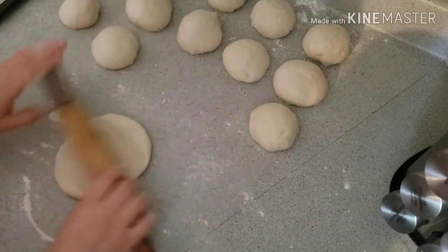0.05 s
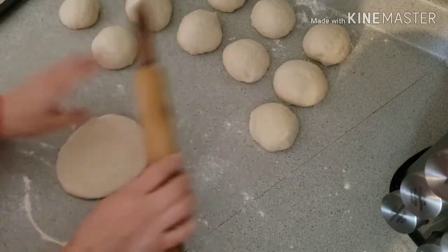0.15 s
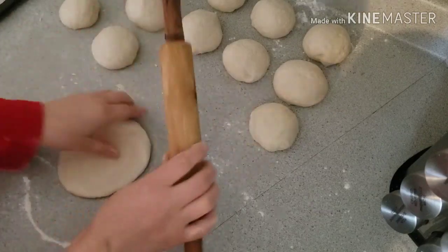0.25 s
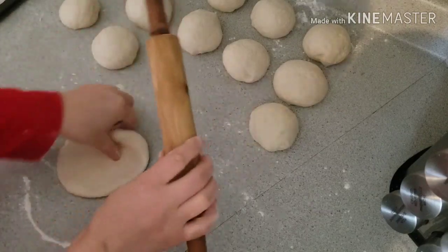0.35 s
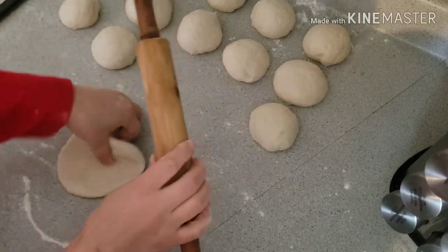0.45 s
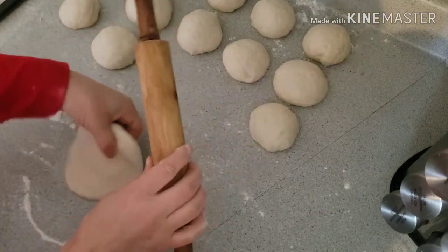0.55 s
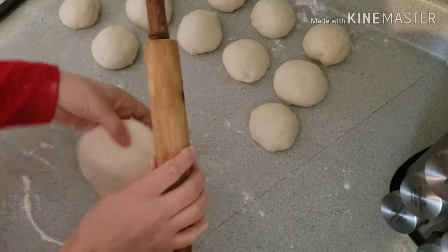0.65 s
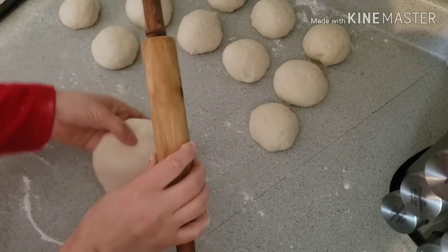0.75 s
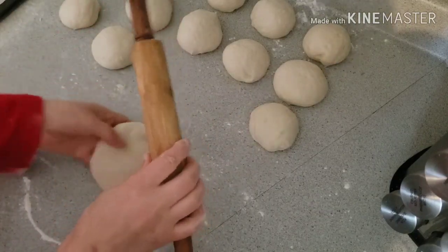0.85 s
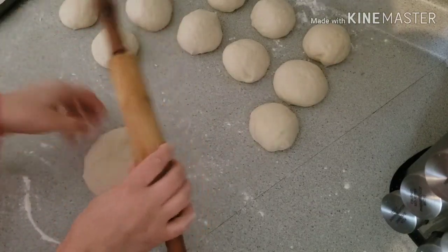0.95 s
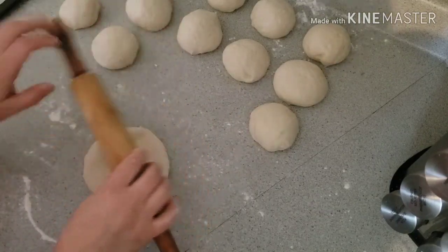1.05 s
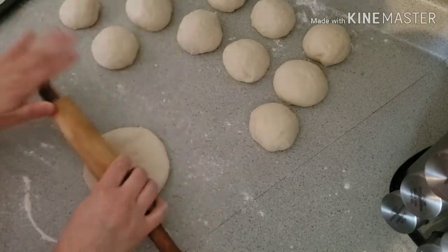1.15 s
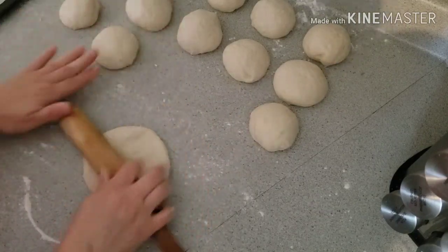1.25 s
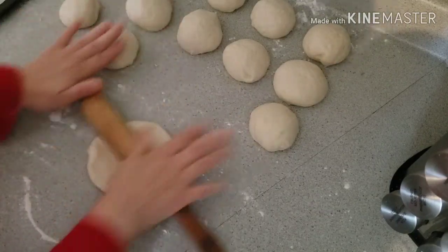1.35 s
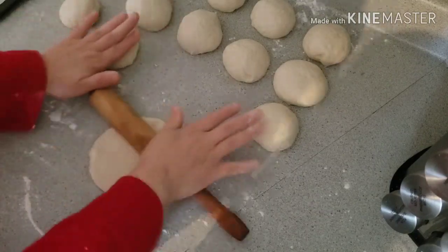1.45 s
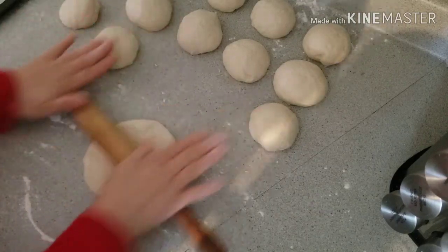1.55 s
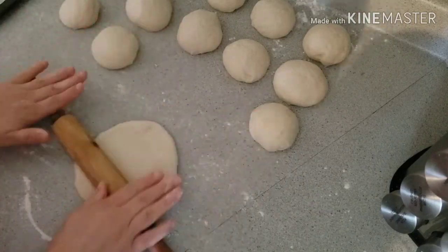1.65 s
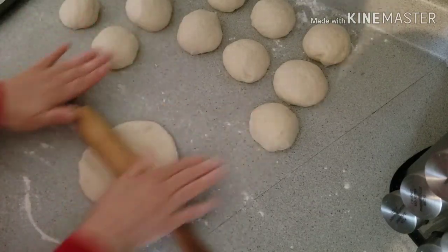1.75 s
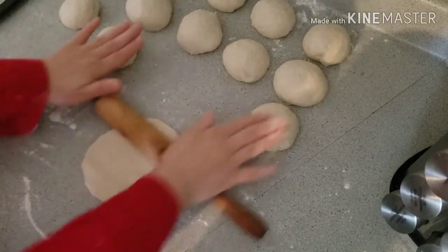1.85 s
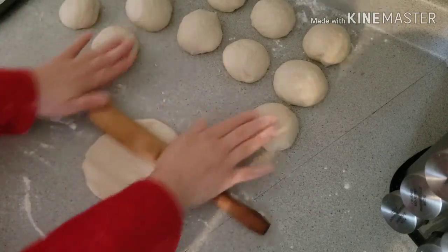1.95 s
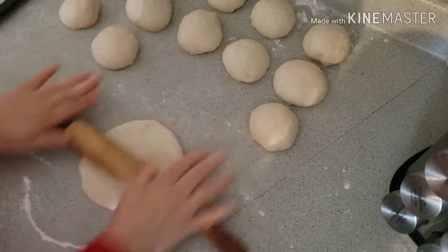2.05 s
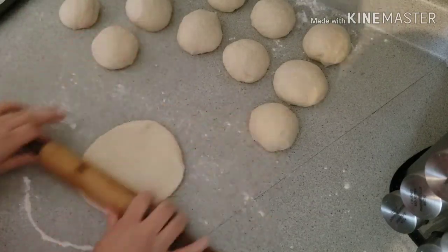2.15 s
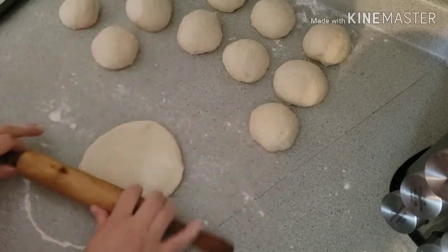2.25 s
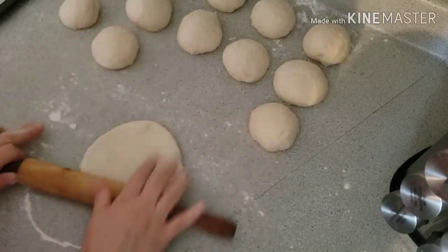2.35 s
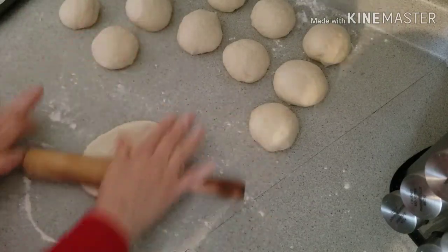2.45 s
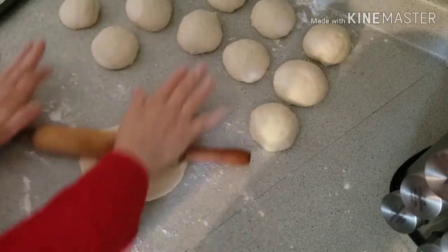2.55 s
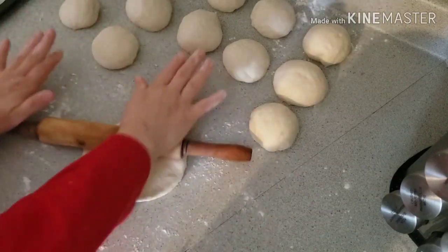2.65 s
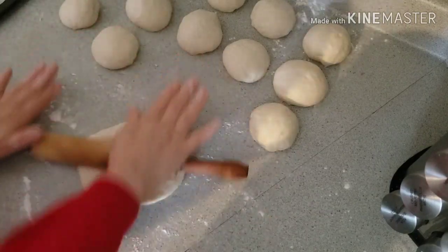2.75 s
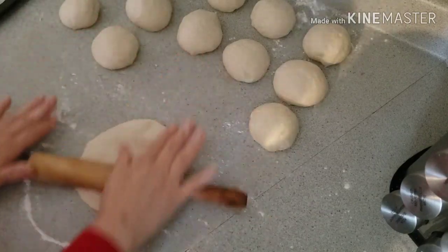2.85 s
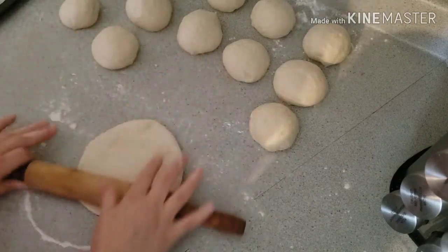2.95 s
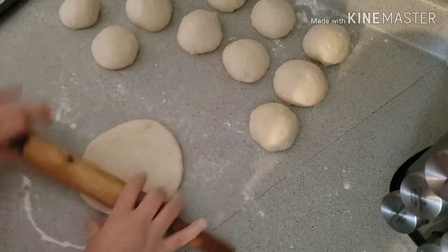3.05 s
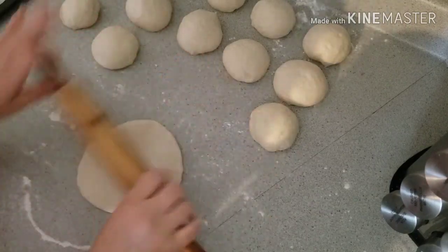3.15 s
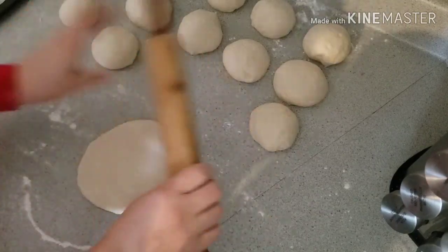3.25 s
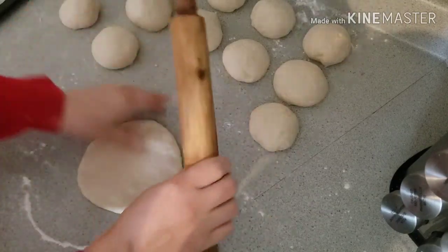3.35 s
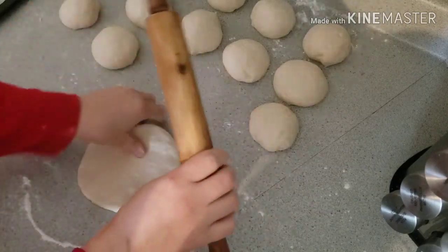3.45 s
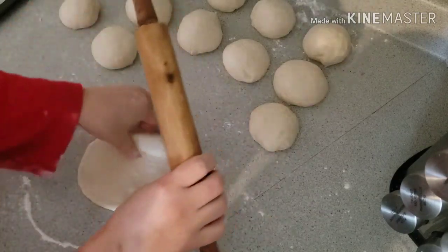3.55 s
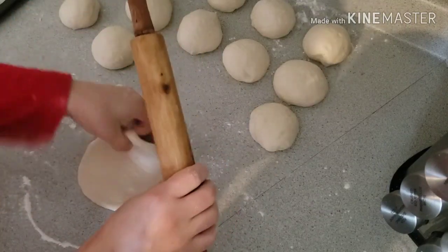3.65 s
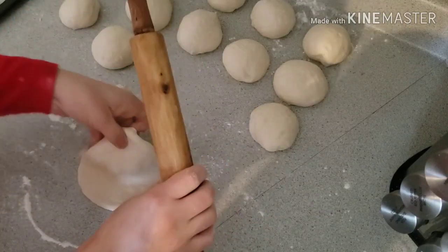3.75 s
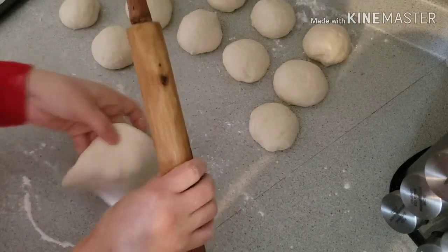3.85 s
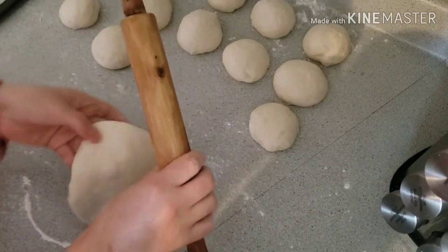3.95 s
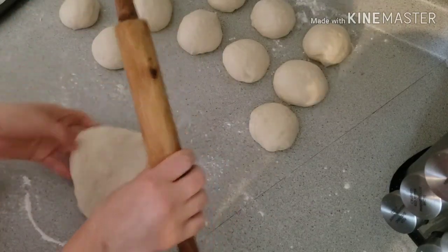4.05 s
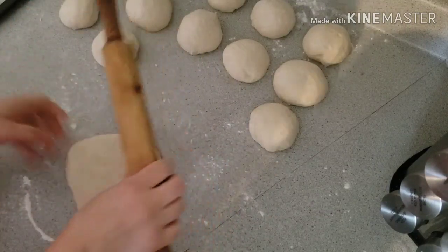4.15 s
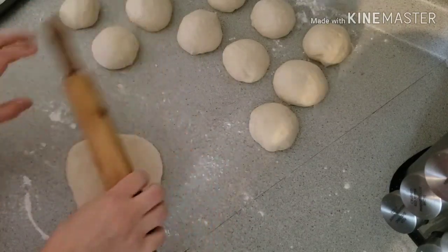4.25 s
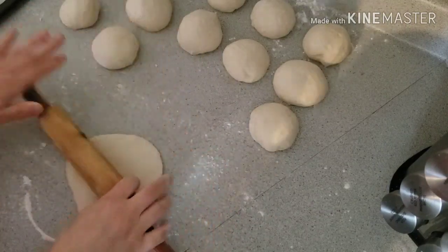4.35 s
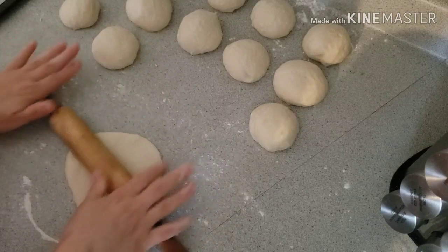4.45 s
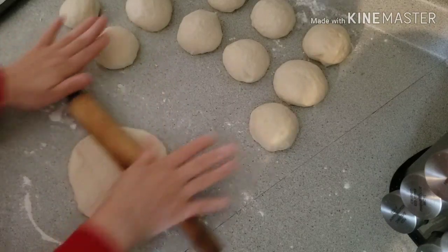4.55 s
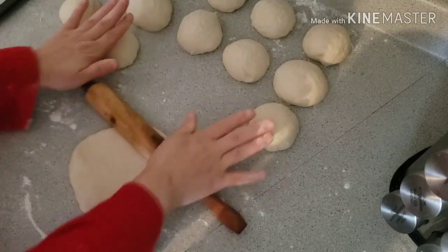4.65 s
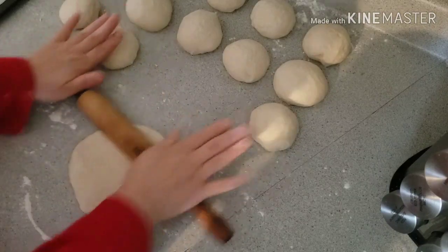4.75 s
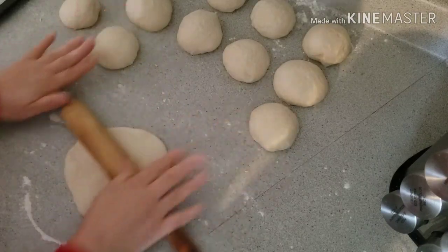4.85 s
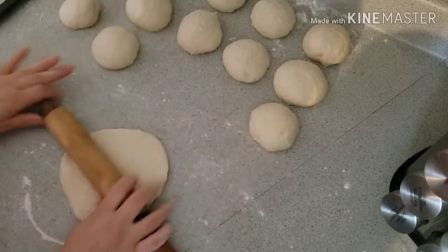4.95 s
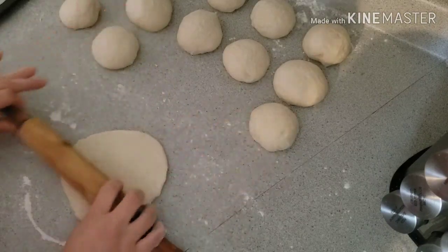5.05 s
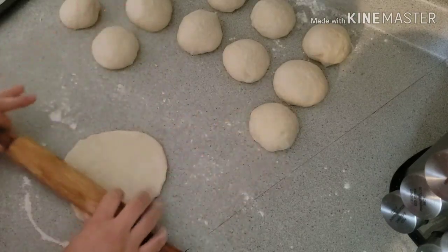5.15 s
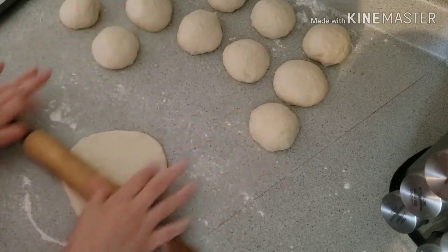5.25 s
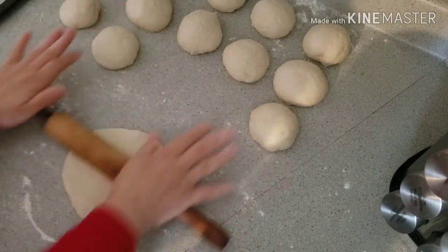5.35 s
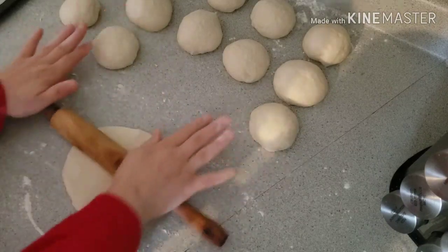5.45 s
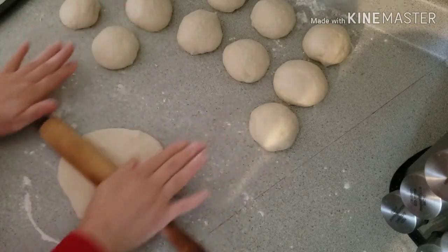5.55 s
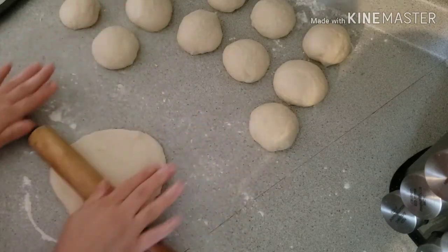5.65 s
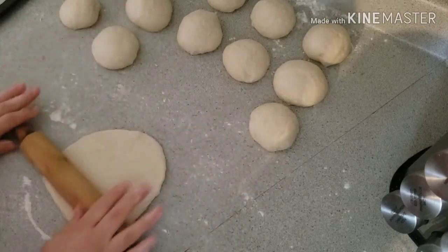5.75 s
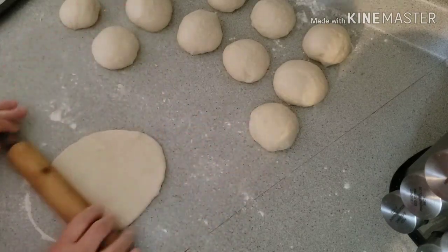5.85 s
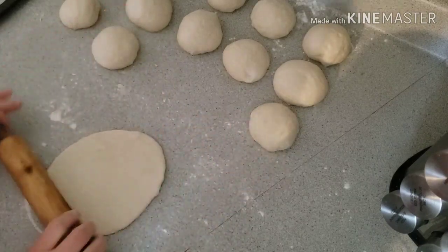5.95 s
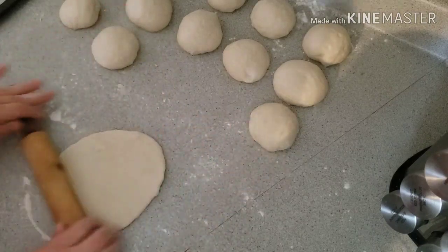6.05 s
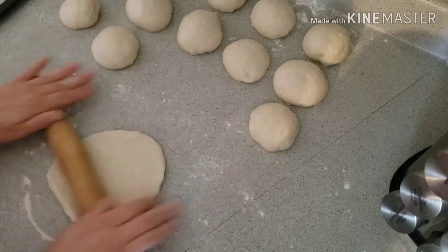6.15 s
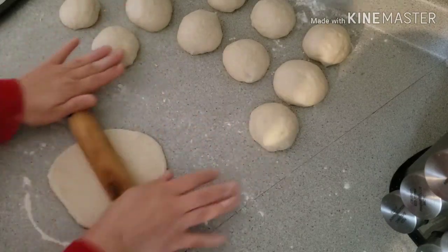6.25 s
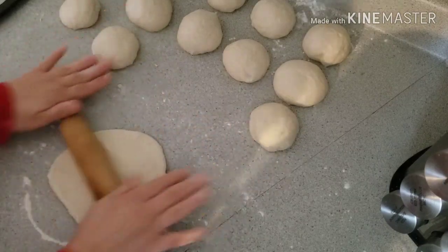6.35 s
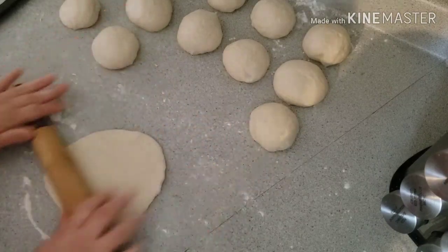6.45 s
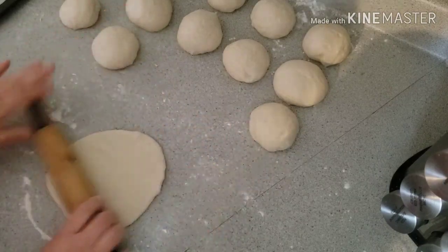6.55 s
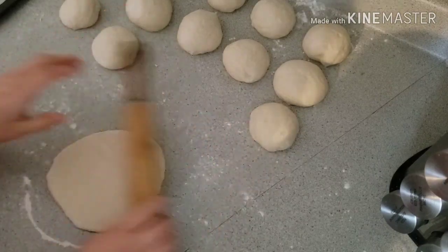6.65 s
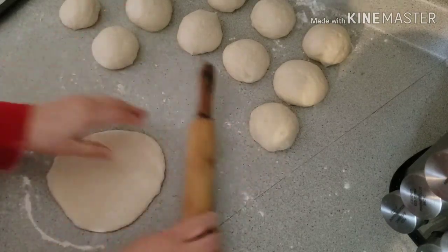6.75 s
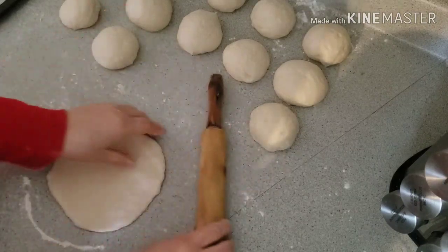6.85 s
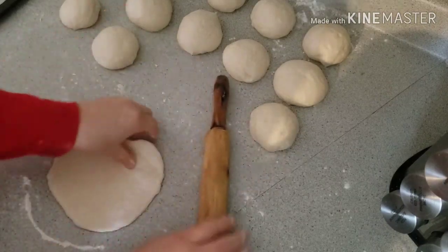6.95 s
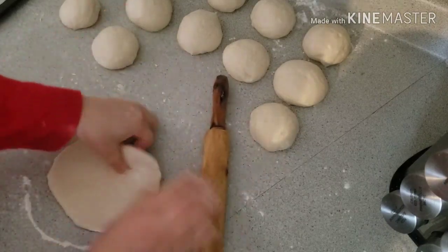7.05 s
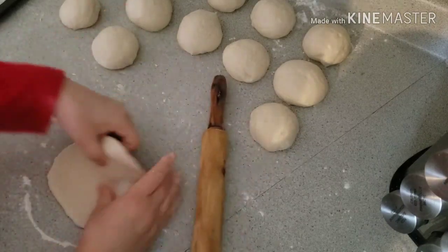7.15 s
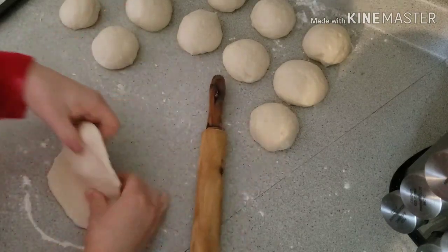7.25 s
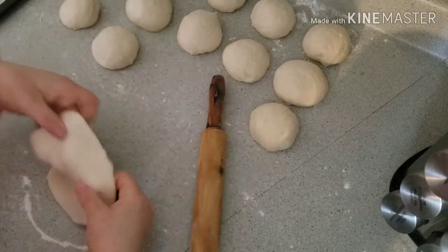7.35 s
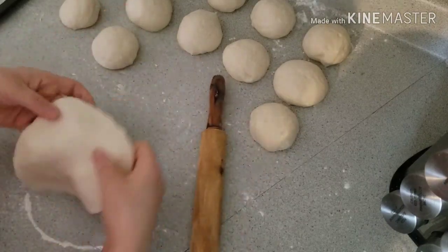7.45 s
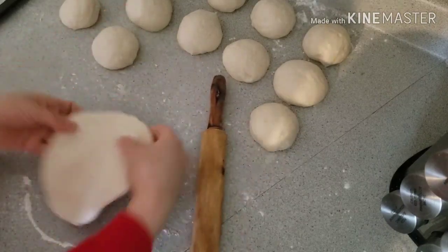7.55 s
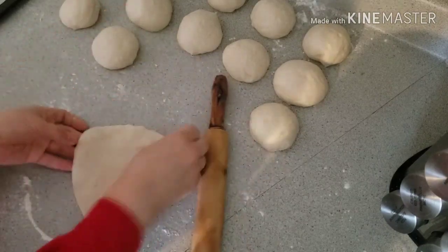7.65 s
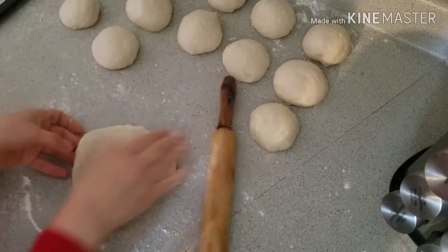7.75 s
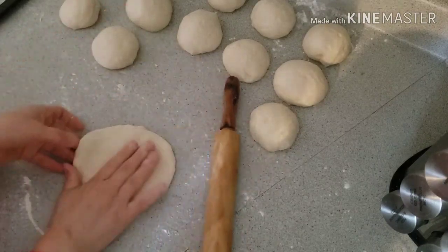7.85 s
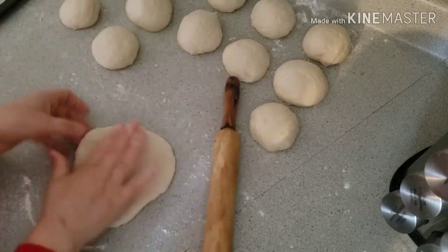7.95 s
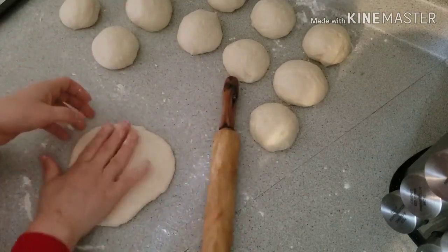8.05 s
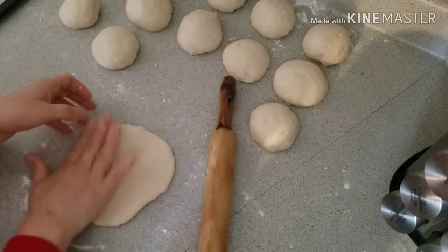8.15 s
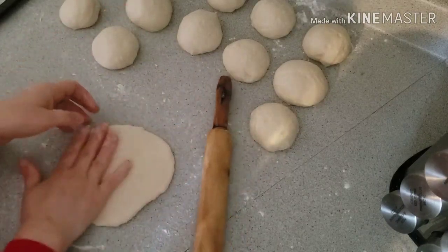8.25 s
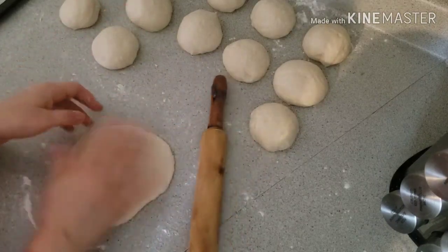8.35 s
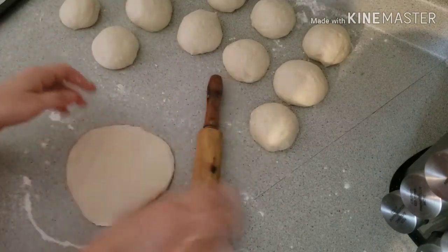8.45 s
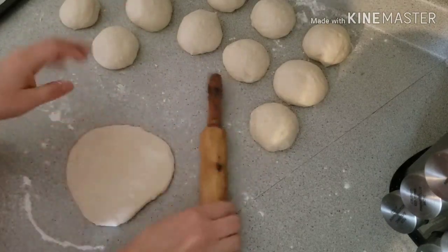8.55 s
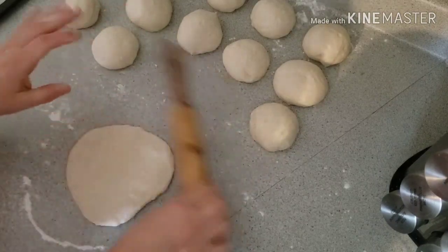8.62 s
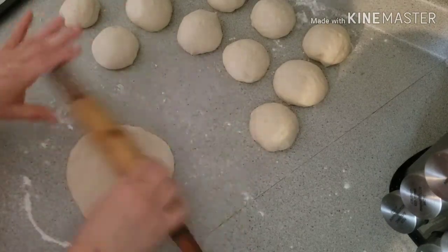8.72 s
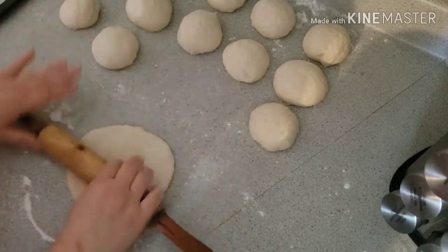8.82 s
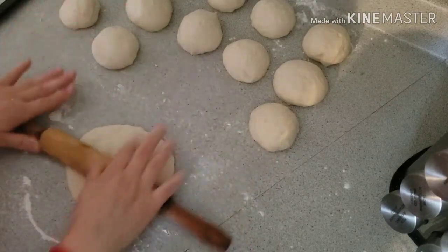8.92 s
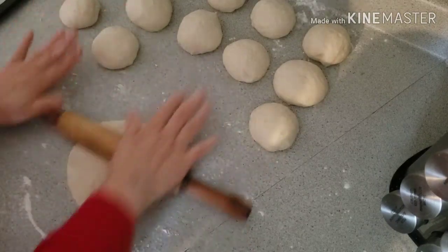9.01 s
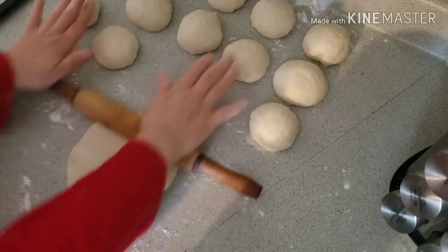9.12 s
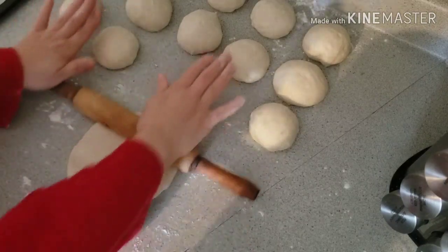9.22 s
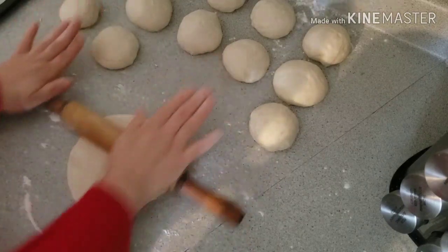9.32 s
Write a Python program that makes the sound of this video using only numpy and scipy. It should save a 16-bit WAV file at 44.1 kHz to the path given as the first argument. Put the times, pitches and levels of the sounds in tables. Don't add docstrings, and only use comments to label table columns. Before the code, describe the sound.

A low fan hum fades out in a kitchen, then a wooden rolling pin knocks and hands pat soft dough on a hard counter.

```python
import sys
import numpy as np
from scipy import signal
from scipy.io import wavfile
from scipy.ndimage import uniform_filter1d

SR = 44100
rng = np.random.default_rng(int(sys.argv[2]) if len(sys.argv) > 2 else 0)


def nominal_scale(level):
    x = np.asarray(level, float) / 20
    return 10 ** x


def inscribe(sig):
    pcm = np.round(np.clip(np.atleast_2d(sig).T, -1, 1) * 32767)
    wavfile.write(sys.argv[1], SR, pcm.astype(np.int16))


N = 413642

THUMP_HZ, TICK_HZ = 119, 5000
SOFT_HZ = 550
LEAD_S = 0.004

# [start_s, knock_db, thump_db, tick_db, knock_pitch_hz]
KNOCKS = [(1.838, -39.5, -51, -89, 406), (1.851, -48, -49, -81, 400), (1.871, -43, -49, -85.5, 400),
          (1.886, -61, -59, -62, 700), (2.436, -35.5, -34, -24, 1780), (2.4403, -37.5, -64, -27.5, 1250),
          (3.048, -42, -49.5, -37.5, 605), (3.585, -46, -74, -49.5, 780), (4.178, -31, -36, -61.5, 890),
          (4.186, -32.5, -39, -67, 1050), (4.497, -36.5, -50, -70, 660), (5.286, -35.5, -47, -26.5, 1020),
          (6.148, -42.5, -50, -44.5, 550), (6.921, -19.5, -27, -44.5, 895), (6.958, -15.5, -28.5, -61, 696),
          (7.71, -37, -44, -42.5, 1730), (7.717, -46, -36.5, -40, 1870), (7.93, -36, -21.5, -43.5, 705),
          (8.099, -40, -39.5, -34, 1090), (8.27, -42.5, -29.5, -46, 526), (8.609, -36, -30, -44, 408),
          (8.96, -16.5, -36, -43.5, 960)]


def pin_knocks():
    rows = []
    for s, knock, thump, tick, hz in KNOCKS:
        clack = knock - 10 + 7 * np.log2(hz / 766)
        clack += min(tick - knock + 25.5, 0)
        rows.append((s, knock, thump, clack, tick, hz, THUMP_HZ, TICK_HZ))
    return rows


# [start_s, thump_db, knock_db, hard_edge_db, thump_pitch_hz]
PATS = [(0.322, -31, -49.5, -104, 110), (0.547, -56, -45.5, -58.5, 120), (0.923, -51, -54, -61.5, 85),
        (1.331, -43, -58, -65, 85), (3.099, -82, -48, -58.5, 120), (3.461, -30.5, -56, -87, 160),
        (3.48, -31.5, -56, -77, 160), (3.563, -32, -52, -65, 150), (3.673, -42, -52, -68, 121),
        (4.5, -39, -70, -82, 86), (4.531, -44, -51, -55.5, 120), (5.765, -52, -54.5, -84, 250),
        (5.812, -40, -53, -72, 140), (6.155, -38.5, -70, -80, 82), (6.92, -15.5, -50, -70, 195),
        (6.957, -12.5, -50, -70, 195), (7.036, -15, -38, -53, 200), (7.055, -26, -27.5, -45, 170),
        (7.076, -27, -46, -58, 170), (7.747, -32.5, -45, -76, 125), (7.778, -28, -43.5, -71, 161),
        (7.797, -33, -60, -80, 150), (7.815, -36.5, -56, -82, 151), (7.953, -30, -46.5, -70, 200),
        (8.102, -29, -56, -80, 90), (8.592, -23.5, -45, -54.5, 126), (8.962, -27, -55, -70, 310),
        (9.173, -36, -45, -65.5, 220), (9.194, -39, -54, -65.5, 219)]


def soft_pats():
    return [(s, knock, thump, edge, edge - 2, SOFT_HZ, hz, TICK_HZ) for s, thump, knock, edge, hz in PATS]


# [start_s, tick_db, knock_db, tick_pitch_hz]
TAPS = [(0.095, -42, -54, 3020), (0.444, -50.5, -54, 5000), (1.14, -52.5, -52, 4600),
        (2.798, -67, -64, 3020), (2.433, -38, -58, 5000), (3.261, -26.5, -46.5, 4400),
        (3.511, -54.5, -59, 5000), (4.178, -39.5, -60, 5000), (4.502, -44.5, -57, 2970),
        (4.507, -34.5, -51, 5030), (5.124, -43, -63, 5000), (5.188, -47.5, -57.5, 5000),
        (5.401, -41, -62, 2930), (6.46, -54.5, -91, 3560), (6.594, -49.5, -53.5, 3100),
        (6.745, -54.5, -66, 5000), (6.923, -37.5, -56.5, 2970), (6.932, -32.5, -50, 6500),
        (7.05, -45.5, -60, 6500), (7.058, -41.5, -50, 2950), (7.874, -62, -78, 6000),
        (8.835, -36, -49.5, 7300)]


def light_taps():
    return [(s, knock, knock - 28.5, (tick + knock) / 2 - 10, tick, SOFT_HZ, THUMP_HZ, hz)
            for s, tick, knock, hz in TAPS]


def all_hits():
    return np.array(sorted(pin_knocks() + soft_pats() + light_taps()))


def ring(modes, db_blow, harden, focus, knock_hz, contact, soften, blunt, chatter, swing, chance, grit):
    hz, db, t60 = np.transpose(modes)[..., None]
    t = np.arange(9000) / SR
    spot, tune = chance[:, :len(modes), None]
    db = db + harden * min(db_blow + 39, 0) * np.log2(hz / hz[0])
    db = db - focus * abs(np.log2(hz / knock_hz)) + 1.2 * spot
    hz = hz * (1 + 0.015 * tune)
    signs = swing ** np.arange(len(modes))[:, None]
    x = (signs * nominal_scale(db - 60 * t / t60) * np.sin(2 * np.pi * hz * t)).sum(0)

    contact = contact * nominal_scale(np.clip(-soften * (db_blow + 27), 0, 7))
    x = np.convolve(x, np.hanning(int(contact * SR) + 3))

    settling = nominal_scale(-60 * t[:grit.shape[1]] / chatter) * np.sqrt(0.0056 / chatter)
    force = grit * settling
    force[:, 0] = nominal_scale(blunt * min(db_blow + 36, 0))
    lead = int(LEAD_S * SR)
    swell = nominal_scale(np.linspace(-41.5, -15.5, lead))
    force = np.c_[grit[:, -lead:] * swell, force]
    plain = np.linalg.norm(force[0]) * (np.arange(force.shape[1]) == lead)
    x = signal.fftconvolve(x[None], np.vstack([force, plain]), axes=1)[:, :len(t)]
    return nominal_scale(db_blow) * x / abs(x[:2]).max(1).mean()


# [band_hz, t60_s]
KITCHEN = [(60, 0.44), (250, 0.37), (700, 0.36), (2000, 0.39), (5000, 0.34), (12000, 0.13)]


def kitchen():
    hz, z = pair(64, size=1024)
    t = np.arange(64) * 256 / SR
    decay = nominal_scale(-60 * t / read(KITCHEN, hz)[:, None])
    tail = signal.istft(z * decay, nperseg=1024, noverlap=768)[1]
    tail = tail * np.clip((np.arange(tail.shape[1]) / SR - 0.002) / 0.00067, 0, 1)
    return tail / np.sqrt((tail ** 2).sum() / 2)


# [mode_hz, level_db, t60_s]
PIN_MODES = [(332.3, 0.041, 0.037), (391.7, 0.82, 0.034), (466, -0.93, 0.021), (545.5, -1.3, 0.038),
             (726, 1, 0.03), (863, 0.85, 0.017), (1041, -0.29, 0.012), (1354, -0.36, 0.023)]
# [mode_hz, level_db, t60_s]
COUNTER_MODES = [(82, -10.5, 0.046), (113, -8, 0.073), (125.5, -9, 0.48), (140, -4.5, 0.062),
                 (176, 0.5, 0.058), (193, -1, 0.06), (238, -0.5, 0.067), (315, -3.5, 0.09)]
# [mode_hz, level_db, t60_s]
CLACK_MODES = [(1095, -3.5, 0.0043), (1401, 0, 0.0044), (1720, -1.5, 0.0061), (2020, -1.5, 0.0043),
               (2268, -2.5, 0.0064), (2830, -5, 0.0035), (3220, -11, 0.00088), (3800, -15.5, 0.0012)]
# [mode_hz, level_db, t60_s]
TICK_MODES = [(2870, -9, 0.018), (3150, -8, 0.013), (4370, -3.5, .004), (5000, -3, .0025),
              (5690, -2.5, .004), (6340, -3.5, .004), (7164, -4, .006), (8800, -10, 0.0016),
              (12400, -13.5, .0008)]
CONTACT_S = [0.00059, 0.0041, 0.000076, .00001]
SOFTEN = [0.011, 0.0058, 0.15, .01]
HARDEN = [0.35, 0.03, 0.037, .01]
FOCUS = [6, 9.4, 6.9, 7.5]
BLUNT = [0.72, 0.0092, 0.46, 0.25]
CHATTER_S = [0.0081, 0.015, 0.038, 0.041]
GRIT = [.2, .04, .4, .45]
APART = [.6, 0, .9, 1]
SWING = [-1., 1., -1., -1.]
TRIM_DB = [2.24, 0.62, 11.14, 7.7]
WET_DB = [-4, -12, -4, -6.5]
FROM_RIGHT_DB = [0.33, .01, .6, 0.87]


def hits():
    rooms = [kitchen() for _ in range(5)]
    out = np.zeros((2, N + SR))
    rows = all_hits()
    chances = rng.standard_normal((len(rows), 4, 2, 9))
    grits = rng.standard_normal((len(rows), 4, 3, 1200))
    apart = np.array(APART)[:, None, None]
    grits = apart * grits[:, :, :2] + np.sqrt(1 - apart ** 2) * grits[:, :, 2:]
    grits = grits * np.array(GRIT)[:, None, None]
    counter_low_cut = signal.butter(2, 75, "high", fs=SR, output="sos")
    late = int(0.002 * SR)
    lag = 5

    for k, (s, *levels_db, knock_hz, thump_hz, tick_hz) in enumerate(rows):
        modes = (PIN_MODES, COUNTER_MODES, CLACK_MODES, TICK_MODES)
        pitches = [knock_hz, thump_hz, knock_hz, tick_hz]
        bodies = zip(modes, levels_db, HARDEN, FOCUS, pitches, CONTACT_S,
                     SOFTEN, BLUNT, CHATTER_S, SWING, chances[k], grits[k])
        parts = np.array([ring(*body) for body in bodies]) * nominal_scale(TRIM_DB)[:, None, None]
        parts[1] = signal.sosfilt(counter_low_cut, parts[1])
        parts[1] = np.roll(parts[1], late, axis=1) * (np.arange(parts.shape[2]) >= late)

        sent = (nominal_scale(WET_DB)[:, None] * parts[:, 2]).sum(0)
        echo = signal.fftconvolve(sent[None], rooms[k % 5], axes=1)
        at = int((s - LEAD_S) * SR)
        out[:, at:at + echo.shape[1]] += echo
        for side, sign in enumerate((-1, 1)):
            heard = nominal_scale(sign * np.array(FROM_RIGHT_DB))[:, None] * parts[:, side]
            out[side, at:at + parts.shape[2]] += heard[1]
            start = at + lag * (1 - side)
            out[side, start:start + parts.shape[2]] += heard.sum(0) - heard[1]
    return out[:, :N]


# [start_s, level_db]
RATTLES = [
    (1.837, -33),
    (1.85, -35),
    (1.862, -40.5),
    (1.873, -39.5),
    (1.889, -42.5),
    (1.9, -50),
]
# [mode_hz, level_db, t60_s]
HANDLE_MODES = [(1020, -5.5, 0.028), (1340, -0.5, 0.027), (1625, -6.5, 0.019), (1840, -10, 0.014)]


def handle():
    hz, db, t60 = np.transpose(HANDLE_MODES)[..., None]
    t, x = np.arange(4000) / SR, np.zeros(N)
    phases = rng.random((len(RATTLES), len(HANDLE_MODES), 1))
    for (s, level_db), phase in zip(RATTLES, phases):
        tap = (nominal_scale(db - 60 * t / t60) * np.sin(2 * np.pi * (hz * t + phase))).sum(0)
        tap = tap * np.minimum(t / 0.0018, 1)
        x[int(s * SR):][:len(t)] += nominal_scale(level_db) * tap
    return x + nominal_scale(-2) * signal.oaconvolve(x[None], kitchen(), axes=1)[:, :N]


# [middle_s, level_db, half_length_s]
ROLLS = [
    (5.81, -57, 0.036),
    (6.4, -69, .06),
    (6.8, -69, .04),
    (2.3, -66, .06),
    (9.03, -54, .035),
    (7.0, -46.5, .025),
]
# [band_hz, db_per_hz]
ROLL_COLOUR = [(110, -20.5), (200, -3), (320, 0), (500, -4), (750, -14), (1200, -40)]


def rolls():
    return swells(ROLLS) * noise(ROLL_COLOUR, size=1024, patchy_db=1.0, flicker_db=0.5)


# [middle_s, level_db, half_length_s]
PEELS = [
    (3.6, -60.5, 0.017),
    (3.689, -65, .012),
    (3.72, -54.5, 0.013),
    (3.762, -52, 0.013),
    (3.788, -64.5, 0.055),
    (5.155, -57.5, 0.011),
    (5.8, -66, 0.022),
    (5.857, -72.5, 0.054),
]
# [band_hz, db_per_hz]
PEEL_COLOUR = [(250, -3.5), (700, 1), (1100, -5), (2300, -3.5), (3300, -11), (5000, -38)]


def peels():
    return swells(PEELS) * noise(PEEL_COLOUR, size=128, patchy_db=-1.0, flicker_db=0.5)


# [middle_s, gate_db, half_length_s, pressure_db]
STROKES = [(.06, -64, 0.063, -64.5), (0.381, -65.5, 0.028, -67), (0.668, -72, 0.05, -84),
           (1.004, -66, 0.042, -66), (1.354, -68, 0.028, -92), (1.471, -68, 0.061, -71),
           (1.698, -69.5, 0.055, -73), (1.909, -67.5, 0.055, -69), (2.236, -67, 0.074, -67),
           (2.54, -75, 0.1, -66), (2.96, -73, 0.091, -74.5), (3.19, -66.5, 0.095, -66.5),
           (3.519, -66, 0.017, -72), (3.755, -75, 0.056, -73), (4.65, -72, 0.093, -75),
           (5.06, -66.5, 0.11, -70.5), (5.142, -56, 0.026, -61), (5.254, -58.5, 0.037, -68),
           (5.393, -74.5, 0.072, -77), (5.705, -74, 0.061, -78), (5.93, -73, 0.11, -77),
           (6.277, -69.5, 0.062, -75), (6.545, -66.5, 0.065, -82), (7.425, -77, 0.12, -84.5),
           (7.462, -71, 0.012, -83), (9.14, -67.5, 0.066, -70.5), (3.049, -61, 0.018, -69),
           (4.484, -65, 0.017, -71), (5.788, -68.5, 0.049, -68.5), (6.144, -70, 0.017, -79),
           (8.951, -70, 0.014, -70)]


def strokes(column):
    return swells(np.array(STROKES)[:, [0, column, 2]])


# [middle_s, peak_db, half_length_s]
SCUFFS = [(3.9, -61, 0.0039), (5.15, -49.5, 0.011), (5.23, -60, 0.006), (5.0, -62, 0.0046),
          (5.262, -53, 0.006), (5.775, -52.5, 0.0077), (6.934, -47, 0.0052), (7.719, -52.5, .012),
          (7.763, -56, 0.003), (8.625, -55, 0.024), (4.595, -67, .06), (4.8, -71.5, 0.052)]


def scuffs():
    t = np.arange(N) / SR
    return sum(nominal_scale(db) * np.exp(-0.5 * ((t - s) / half) ** 2) for s, db, half in SCUFFS)


# [band_hz, db_per_hz]
RUB_COLOUR = [(880, -55.5), (1500, -51.5), (1570, -17.5), (2040, -14.5), (2700, -15), (3050, 6.5),
              (3450, -21), (4490, -2), (4740, -4), (6060, -6), (7000, -1), (8330, -10.5), (10000, -39.5),
              (13000, -52), (22000, -120)]


def flour():
    trickle = after(4, db=-62, share=-0.35, rise=1.8, fall_db=93.5)
    rubbed = strokes(3) + trickle + scuffs()
    return rubbed * noise(RUB_COLOUR, size=256, patchy_db=1.2, flicker_db=1.5)


# [band_hz, db_per_hz]
MURMUR_COLOUR = [(150, -33.5), (250, -9.5), (520, 4), (794, -6), (1230, -6.5), (1570, -10.5), (2040, -18.5),
                 (2500, -17), (3250, -29), (5500, -120)]


def murmur():
    knocked = after(1, db=-63, share=1.13, rise=-1.68, fall_db=116.5)
    rolled = nominal_scale(-2) * strokes(3) + knocked + nominal_scale(-70) * nominal_scale(run_down())
    return rolled * noise(MURMUR_COLOUR, size=512, patchy_db=1.5, flicker_db=1.5)


# [time_s, level_db]
FAN_DB = [
    (0.0, -46),
    (0.44, -55),
    (0.83, -52),
    (0.95, -59),
    (1.14, -47),
    (1.62, -61),
    (1.64, -54.5),
    (1.84, -51),
    (2.4, -78),
]
# [band_hz, db_per_hz]
FAN_AIR_COLOUR = [(18, -50), (30, -9), (53, -45.5), (140, -29), (173, 0.5), (244, -5), (469, -7),
                  (501, -16), (874, -15), (964, -26.5), (1500, -62.5), (1950, -73), (3300, -120)]
# [pitch_hz, level_db]
FAN_LINES = [(60, -17), (120, -6), (213, -9.5), (240, -14.5), (300, -11.5), (360, -14), (466, -11.5)]


def fan():
    air = noise(FAN_AIR_COLOUR, size=2048, patchy_db=1.5, flicker_db=1.0)
    loss_db = run_down()
    duct_hz = 168 + 0.8 * loss_db
    duct = resonate(resonate(rng.standard_normal(N), duct_hz, 15), duct_hz, 21)
    duct = duct / uniform_filter1d(abs(duct), size=1500) ** 0.65
    duct = nominal_scale(curve(FAN_DB, column=1)) * evened(duct) * (loss_db > -39)
    motor = sum(nominal_scale(db) * evened(resonate(rng.standard_normal(N), hz, 1.0)) for hz, db in FAN_LINES)
    return duct + nominal_scale(loss_db) * (nominal_scale(-56.0) * motor + nominal_scale(-56.5) * air)


def run_down():
    return np.interp(np.arange(N) / SR, [1.8, 2.3, 2.5], [0, -11, -40])


# [band_hz, db_per_hz]
RUMBLE_COLOUR = [(12, -39), (20, -15), (38, 5.5), (65, 3.5), (125, -2.5), (145, -21), (225, -4), (258, -14),
                 (285, -8.5), (400, -18.5), (520, -29), (880, -120)]


def rumble(gate):
    thumped = after(2, db=-46.5, share=0.2239, rise=0.17, fall_db=113)
    moving = nominal_scale(-7) * uniform_filter1d(gate, size=6000)
    shaken = thumped + nominal_scale(-76) + moving + nominal_scale(-61) * nominal_scale(run_down())
    return shaken * noise(RUMBLE_COLOUR, size=2048, patchy_db=0.5, flicker_db=-5.0)


# [start_s, level_db]
SNAPS = [(0.446, -67), (1.134, -63.5), (2.436, -57), (3.045, -78), (3.259, -57), (3.583, -62),
         (4.176, -53.5), (4.5, -65), (5.779, -64), (6.15, -78), (6.92, -70), (7.038, -65), (7.712, -53.5),
         (7.929, -61), (8.098, -56.5), (8.272, -65), (8.61, -57.5), (8.835, -67), (8.958, -64)]


def noise_gate():
    s, db = np.transpose(SNAPS)
    rise = 0.0027
    return strokes(1) + fading(s, db, rise, 354.5) + fading(s, db - 14, rise, 111.5)


# [band_hz, db_per_hz]
HISS_COLOUR = [(880, -21), (1500, -15.5), (1760, -13.5), (2870, -5.5), (3040, -17), (3930, -12),
               (7220, -4.5), (8370, -10), (14800, -7.5), (15600, -6)]


def hiss(gate):
    return nominal_scale(5.5) * gate * noise(HISS_COLOUR, size=512, patchy_db=1.6, flicker_db=0.0)


# [band_hz, db_per_hz]
QUIET_COLOUR = [(15, -37), (25, 19), (86, -13.5), (161, -16), (586, -7), (1060, -11), (2870, -17.5),
                (3860, -24), (6990, -10), (9160, -21), (15600, -15)]


def quiet_room():
    return nominal_scale(-65.5 - 9.0) * noise(QUIET_COLOUR, size=1024, patchy_db=3.5, flicker_db=-1.2)


def evened(x):
    return x / np.sqrt(np.mean(x ** 2) + 1e-20)


def read(points, hz):
    f, value = np.transpose(points)
    return np.interp(np.log(hz + 1), np.log(f + 1), value, left=value[0], right=value[-1])


def curve(rows, column):
    rows = np.asarray(rows)
    return np.interp(np.arange(N) / SR, rows[:, 0], rows[:, column])


# [band_hz, likeness_0_to_1]
SAME = [(30, 0.5), (100, 0.92), (250, 0.94), (500, 0.7), (1000, 0), (4000, 0), (15000, 0.2)]


def pair(frames, size):
    hz = np.fft.rfftfreq(size, 1 / SR)
    a, b, c, d = rng.standard_normal((frames, len(hz), 4)).T
    same = np.clip(read(SAME, hz), -1, 1)[:, None]
    left = a + 1j * b
    return hz, np.array([left, same * left + np.sqrt(1 - same ** 2) * (c + 1j * d)])


def noise(colour, size, patchy_db, flicker_db):
    frames = 4 * N // size + 5
    hz, z = pair(frames, size)
    patches = rng.standard_normal((frames, len(hz))).T
    patches = evened(uniform_filter1d(uniform_filter1d(patches, size=9, axis=0), size=7, axis=1))
    flicker = np.clip(evened(uniform_filter1d(rng.standard_normal(frames), size=3)), -2, 2)
    inside = (hz >= colour[0][0]) & (hz <= colour[-1][0])
    colour_db = (read(colour, hz) - 90 * ~inside)[:, None]
    z = z * nominal_scale(colour_db + patchy_db * patches + flicker_db * flicker)
    x = signal.istft(z, nperseg=size, noverlap=3 * size // 4)[1][:, :N]
    return x / np.sqrt(np.mean(x.mean(0) ** 2))


def resonate(x, hz, width):
    turn = np.exp(2j * np.pi * np.cumsum(hz * np.ones(N)) / SR)
    r = np.exp(-np.pi * width / SR)
    return 2 * (turn * signal.lfilter([1 - r], [1, -r], x / turn)).real


def level(gains):
    return np.interp(np.arange(N) / SR, np.arange(gains.shape[1]) / 1000, np.sqrt((gains ** 2).sum(0)))


def since(s):
    return np.arange(0, N / SR, 1 / 1000) - np.asarray(s)[:, None]


def swells(rows):
    s, db, half = np.transpose(rows)[..., None]
    return level(nominal_scale(db) * np.exp(-0.5 * (since(s[:, 0]) / half) ** 2))


def fading(s, db, rise, fall_db):
    t = np.maximum(since(s), 0)
    return level(np.minimum(t / rise, 1) * nominal_scale(db[:, None] - fall_db * t))


def after(column, db, share, rise, fall_db):
    rows = all_hits()
    return fading(rows[:, 0], db + share * (rows[:, column] + 40), rise, fall_db)


def scene():
    gate = noise_gate()
    working = hits() + handle() + rolls() + peels() + flour() + murmur()
    return working + fan() + rumble(gate) + hiss(gate) + quiet_room()


def low_pass(x):
    return signal.sosfilt(signal.butter(12, 16630, fs=SR, output="sos"), x)


def record(dry):
    lean_db = -1.2
    leaning = dry * nominal_scale(np.array([[lean_db / 2], [-lean_db / 2]]))
    shaded_hz, width_hz = 3596, 360
    band = signal.lfilter(*signal.iirpeak(shaded_hz, shaded_hz / width_hz, SR), leaning)
    low_cut = signal.butter(2, 54.3, "high", fs=SR, output="sos")
    mix = signal.sosfilt(low_cut, leaning - 0.25 * band)
    return low_pass(mix)


dry = scene()
out = record(dry)
inscribe(out)
```